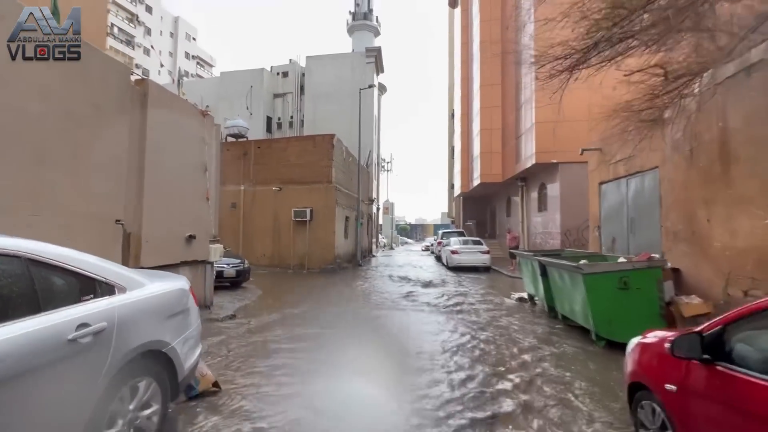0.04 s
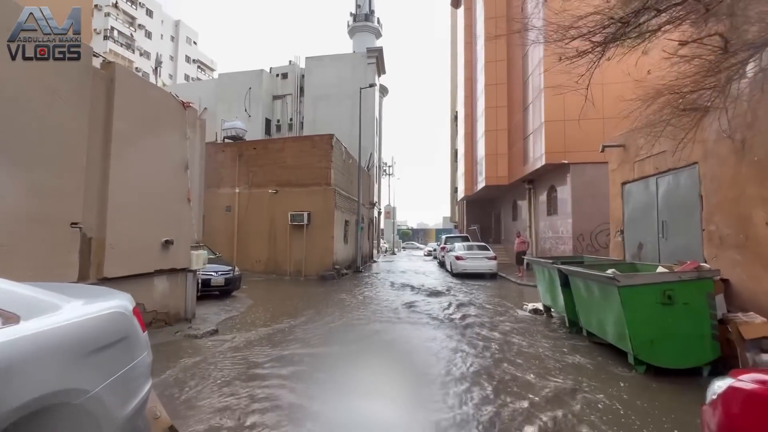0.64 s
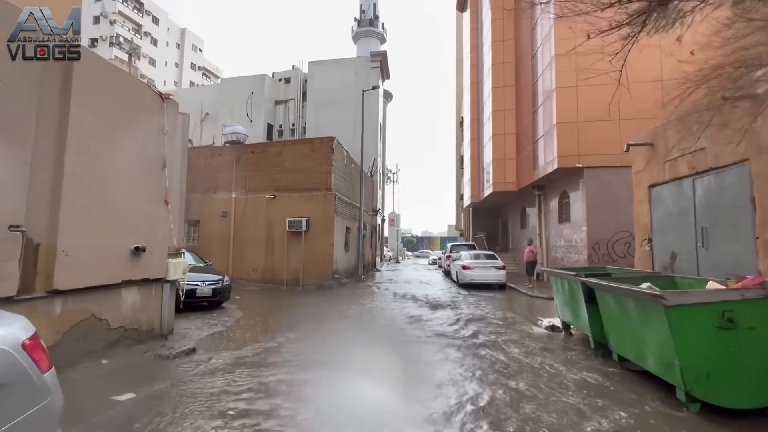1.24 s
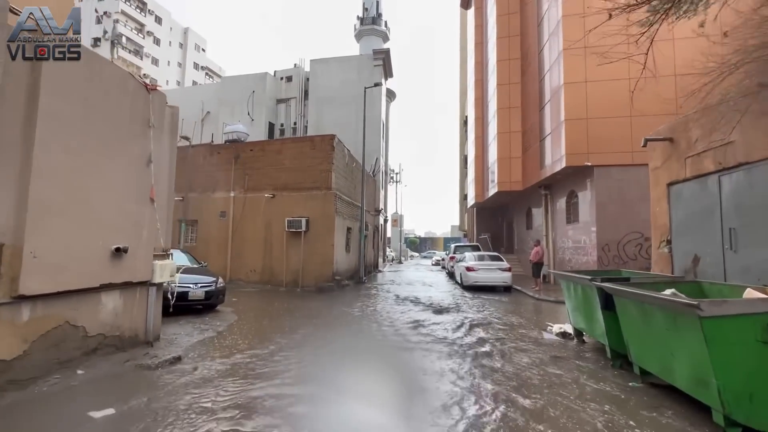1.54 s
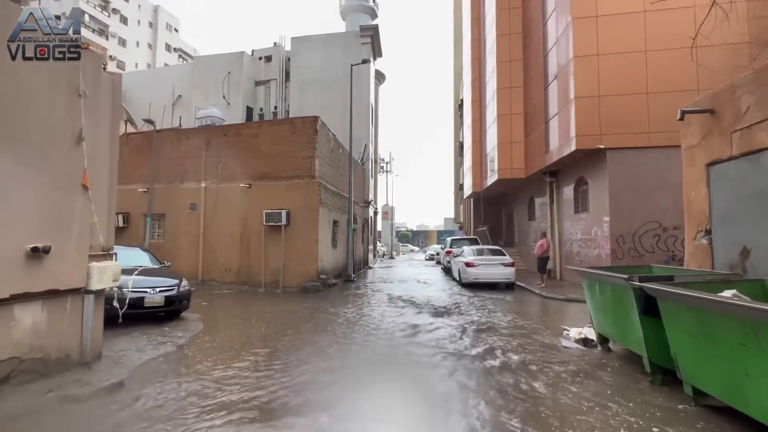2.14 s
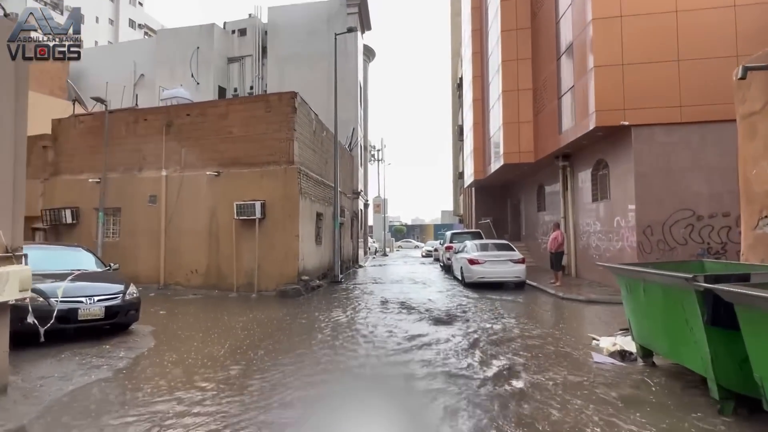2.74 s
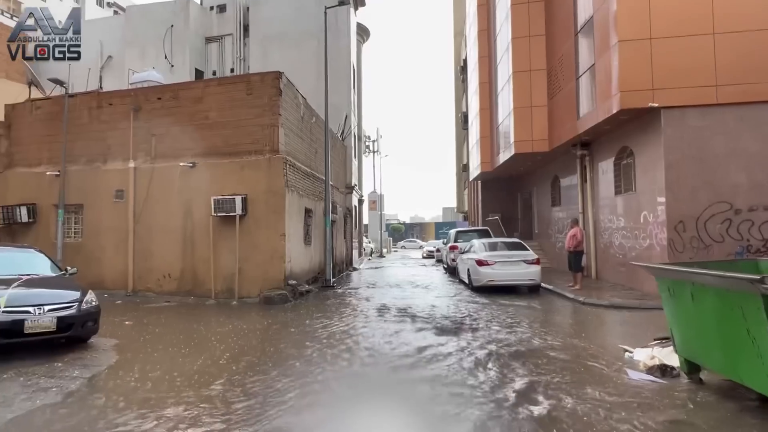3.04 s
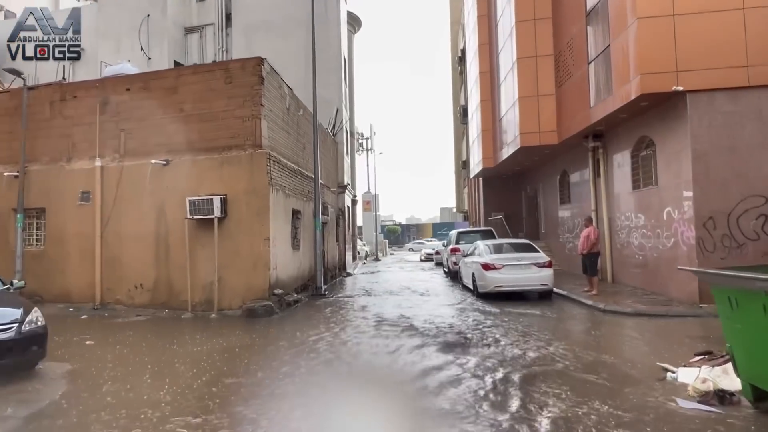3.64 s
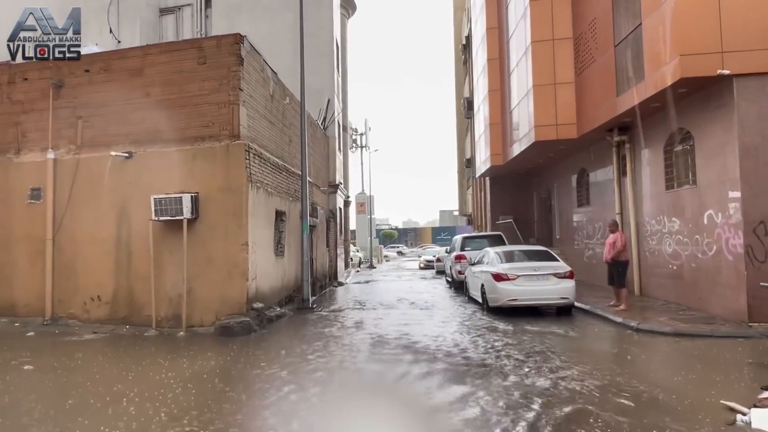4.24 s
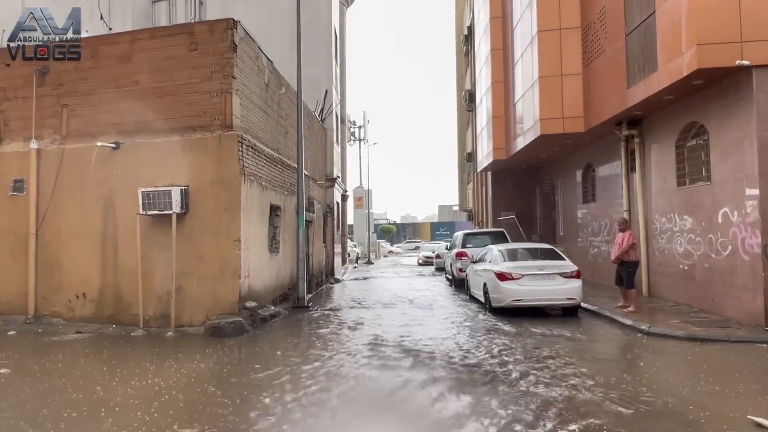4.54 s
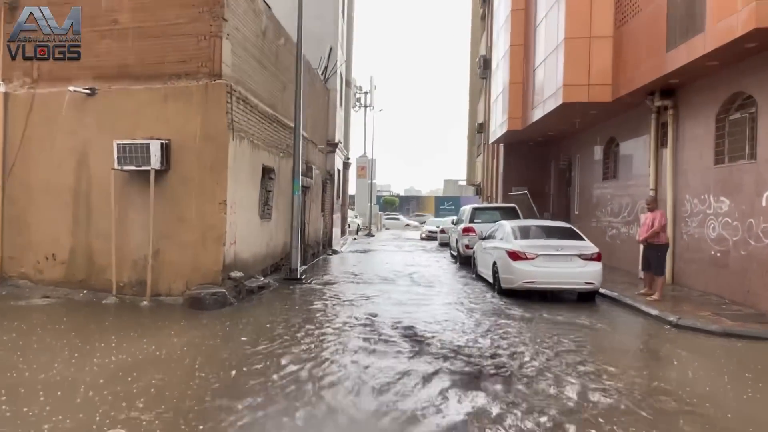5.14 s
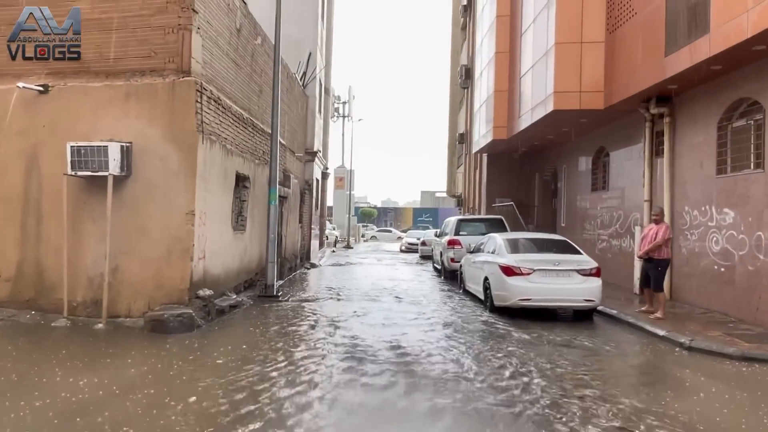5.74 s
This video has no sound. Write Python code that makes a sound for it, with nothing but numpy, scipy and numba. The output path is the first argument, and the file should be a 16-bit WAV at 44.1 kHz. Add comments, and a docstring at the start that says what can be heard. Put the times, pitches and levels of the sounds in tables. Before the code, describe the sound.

Rainwater runs steadily along a flooded street, babbling and gurgling, with small splashes and close plops.

```python
"""Rainwater runs along a flooded street between house walls, heard from a camera carried over it.
Ripples fold air into bubbles that babble near 1 kHz; larger pockets gurgle, plop and glug.
Crests break into churn, splash, sizzle and fine fizz with sharp ticks.
A few drops tap on the camera's casing, and air thumps softly on the microphone.
Under it all lie the wash of the whole street and a low rumble of town and moving air."""
import sys
import numpy as np
from scipy import signal
from scipy.fft import rfft, irfft
from scipy.io import wavfile
from scipy.ndimage import uniform_filter1d
from numba import njit

SR = 44100
rng = np.random.default_rng(int(sys.argv[2]) if len(sys.argv) > 2 else 0)


def generate_wav(sig):
    """Save sig (samples, or channels by samples) to the path in sys.argv[1] as 16-bit PCM at SR."""
    pcm = np.round(np.clip(np.atleast_2d(sig).T, -1, 1) * 32767).astype(np.int16)
    wavfile.write(sys.argv[1], SR, pcm)


N = 260571
TIME_S = np.arange(N) / SR
FREQ_HZ = np.maximum(np.fft.rfftfreq(N, 1 / SR), 1)

# Nearby current. Each row: time in seconds, level in dB against its usual strength.
CURRENT_STRENGTH = [(0, 0.5), (0.17, -2.5), (0.4, 0), (0.8, 3), (1.45, 1), (1.58, -0.5), (1.85, 2),
                    (2.15, -1), (2.35, -3.5), (2.6, 0.5), (3.15, 4), (3.29, 0), (3.5, 3.5), (3.85, 1),
                    (4.3, 3), (4.95, 1), (5.33, 0.5), (5.91, -1.5)]
# Steady gurgling. Each row: time in seconds, level in dB.
GURGLE_LEVELS = [(0, -42), (1.25, -49.5), (1.8, -47), (2.35, -59.5), (2.7, -43), (3.2, -46), (3.65, -45.5),
                 (3.85, -52), (4.2, -46.5), (4.5, -61.5), (5.35, -53), (5.91, -41.5)]
# Water folding over large air pockets. Each row: time in seconds, level in dB.
AIR_GULPS = [(0.2, -42), (0.76, -49), (1.035, -41.5), (1.385, -39.5), (2.61, -39), (2.99, -43),
             (3.11, -32.5), (5.555, -36), (5.84, -40)]
# Breaking crests. Each row: start and hold in seconds, relative babble, churn and splash levels in dB.
BREAKING_CRESTS = [(0.368, 0.019, -35.5, -46, -55), (0.49, 0.028, -38, -47, -66),
                   (0.687, 0.11, -39.5, -45, -50), (0.879, 0.035, -36.5, -44.5, -48),
                   (1.084, 0.055, -37, -46, -52), (1.207, 0.037, -35, -50, -52),
                   (1.31, 0.11, -41, -48, -50), (1.947, 0.08, -42, -48, -49), (2.208, 0.084, -61, -48, -46),
                   (2.404, 0.11, -38.5, -48.5, -48), (2.525, 0.11, -34.5, -48.5, -45.5),
                   (2.725, 0.18, -43, -66, -58), (2.957, 0.062, -37.5, -45, -52),
                   (3.048, 0.11, -42, -44, -42.5), (3.162, 0.075, -55, -49, -46),
                   (3.426, 0.057, -52, -40, -42), (3.518, 0.28, -51, -49.5, -45.5),
                   (3.593, 0.065, -42, -42, -45), (4.007, 0.041, -52, -48, -44.5),
                   (4.192, .015, -55, -53, -45.5), (4.25, 0.014, -46, -47, -48),
                   (4.691, .26, -59, -46.5, -41), (4.808, 0.2, -41.5, -59, -48.5),
                   (5.208, 0.02, -36, -46, -47.5), (5.55, 0.13, -55, -46, -49.5),
                   (5.844, 0.012, -30.5, -45, -43)]
# Air on the microphone. Each row: start and hold in seconds, relative level in dB.
AIR_PUFFS = [(0.023, 0.3, -52.5), (0.692, 0.28, -54.5), (1.328, 0.11, -53), (3.116, 0.087, -53),
             (3.705, 0.092, -53.5), (5.004, 0.12, -52.5), (5.545, 0.093, -44.5), (5.87, .04, -51)]
# Close bubbles. Each row: start in seconds, relative peak in dB, starting pitch in Hz, life in seconds,
# glide as a share of pitch, left minus right in dB.
CLOSE_BUBBLES = [(0.086, -23, 860, 0.023, -0.089, -6), (0.3639, -20, 905, 0.0074, .1, 7),
                 (0.376, -28, 1050, .008, -0.089, 0), (0.503, -27, 905, .014, 0.35, -3),
                 (0.5475, -18.5, 920, 0.0092, 0.37, 0), (0.547, -28, 1640, 0.014, 0.17, 21),
                 (0.689, -32, 770, 0.013, -0.0075, 2), (0.728, -27, 556, 0.12, -0.2, -5),
                 (0.757, -24, 552, 0.087, 0.15, -4), (0.772, -21.5, 532, 0.08, -0.039, 3),
                 (0.893, -24, 833, 0.046, 0.21, 0), (1.0865, -18.5, 1050, 0.027, .1, 1),
                 (1.165, -24, 1050, 0.022, .2, 1), (1.221, -28, 990, 0.028, .1, 0),
                 (1.2314, -15.5, 1030, 0.023, -0.072, -2), (1.291, -26, 940, 0.023, 0.0011, 4),
                 (1.3292, -19, 1450, 0.0079, 0.26, 2), (1.347, -22, 1090, 0.0073, 0.22, 0),
                 (1.964, -18, 910, 0.029, 0.057, -1), (2.139, -25.5, 1060, .015, 0.57, 8),
                 (2.191, -29, 1670, 0.024, -0.17, 16), (2.279, -21.5, 950, .007, .1, 10),
                 (2.426, -28.5, 1840, 0.024, 0.0063, 3), (2.477, -34.5, 3700, 0.016, .1, 0),
                 (2.522, -15.5, 1020, 0.03, 1.0, -1), (2.579, -22, 774, 0.02, -0.27, -7),
                 (2.581, -21, 1660, 0.0089, 0.12, 1), (2.622, -26, 937, 0.021, 0.052, -2),
                 (2.800, -20, 764, 0.024, -0.15, -3), (2.854, -20, 725, 0.023, 0.017, -4),
                 (2.877, -20.5, 1000, 0.011, -0.068, -2), (2.974, -27.5, 940, 0.032, -0.084, 6),
                 (2.987, -22, 830, 0.016, 0.013, -1), (3.009, -29, 1070, 0.023, 0.41, 0),
                 (3.052, -21, 894, 0.031, 0.14, 0), (3.056, -20.5, 643, 0.037, -0.23, -4),
                 (3.068, -27, 1520, 0.02, 0.73, 1), (3.091, -25, 880, 0.043, 0.061, -5),
                 (3.105, -20, 905, 0.03, 0.1, 2), (3.112, -20, 905, .025, 0.16, -4),
                 (3.138, -29, 977, 0.016, .2, 0), (3.357, -20, 925, 0.013, -0.21, -4),
                 (3.358, -29, 670, .025, 0.045, -7), (3.449, -22, 1510, 0.023, .1, 0),
                 (3.449, -25, 995, 0.038, 0.046, 0), (3.472, -23, 1060, 0.022, 0.042, -4),
                 (3.49, -23, 880, 0.018, .2, -5), (3.527, -23, 905, 0.037, 0.055, -1),
                 (3.555, -18, 930, 0.018, 0.38, -1), (3.625, -24, 1110, 0.02, -0.13, 2),
                 (3.6411, -18, 1045, 0.021, 0.33, 10), (3.642, -31, 1610, 0.026, 0.054, 15),
                 (3.709, -20.5, 970, .02, 0.0004, -3), (3.95, -27, 907, 0.041, 0.43, 3),
                 (4.0305, -20, 1040, 0.01, -0.023, 0), (4.0303, -25, 2470, 0.02, 0.16, -5),
                 (4.168, -21, 821, 0.023, .1, 0), (4.1974, -34, 2560, 0.031, .1, -2),
                 (4.695, -24, 940, .007, 0.2, -3), (4.783, -25.5, 1770, 0.018, 0.11, -1),
                 (4.839, -20.5, 740, 0.014, 0.071, -5), (4.904, -25, 835, 0.032, 0.23, -7),
                 (4.939, -22, 1000, 0.018, -0.41, -1), (4.959, -21, 980, .015, 0.13, 0),
                 (5.064, -24.5, 990, 0.04, 0.16, 1), (5.197, -29, 1070, 0.01, 0.18, -9),
                 (5.593, -27, 573, .014, -0.033, -15), (5.669, -26.5, 1700, 0.013, -0.11, 16),
                 (5.8473, -30, 1940, 0.009, -0.01, -4)]
# Closing hollows. Each row: start in seconds, relative peak in dB, first and last pitch in Hz,
# length in seconds, left minus right in dB.
CLOSING_HOLLOWS = [(0.194, -31, 493, 510, 0.032, 0), (0.228, -26, 645, 1180, 0.021, 2),
                   (0.796, -27.5, 855, 1207, 0.024, -2), (1.113, -26, 814, 1160, 0.023, -6),
                   (1.135, -28, 820, 1120, 0.024, -2), (1.379, -29, 940, 1220, 0.017, 0),
                   (1.381, -24.5, 527, 670, 0.023, 4), (1.395, -26.5, 645, 1080, .02, 3),
                   (2.588, -26.5, 772, 1060, .022, -1), (3.102, -23, 630, 970, 0.023, -4),
                   (3.734, -30, 880, 1140, 0.023, -5), (5.548, -30, 760, 1350, .018, -4),
                   (5.59, -28, 900, 1450, .023, -6)]
# Close spray. Each row: start in seconds, relative ring peak in dB, starting pitch in Hz,
# relative snap level in dB.
SPRAY_TICKS = [(0.6522, -31, 8900, -40), (0.912, -36, 10500, -45), (1.0427, -27, 9700, -45),
               (1.246, -32, 10200, -42), (1.257, -31, 8900, -50), (1.4297, -35, 8900, -50),
               (1.4453, -16.5, 10600, -43), (1.5254, -27, 8650, -40), (1.6611, -26, 9800, -48),
               (2.2034, -31.5, 9100, -45), (2.4563, -28, 8860, -46), (2.5341, -34, 8650, -52),
               (2.584, -36, 8600, -51), (3.067, -31, 8350, -35), (3.6068, -27, 8900, -48),
               (3.6767, -24, 9000, -32), (3.696, -30, 8400, -44), (3.8287, -30, 9400, -46),
               (4.1985, -32.5, 8000, -48), (5.49, -34, 9600, -45)]
# Taps of drops on the casing and soft low thumps of air on the microphone. Each row: start in seconds,
# tap peak in dB, tap life in seconds, thud peak in dB, starting thud pitch in Hz, left minus right in dB.
CAMERA_KNOCKS = [(0.881, -42, .02, -38, 75, -6), (1.382, -31, 0.1, -40, 202, 14),
                 (1.815, -45, .02, -40, 151, 2), (2.984, -24, 0.013, -39, 215, 6),
                 (3.354, -30, .02, -37.5, 116, -13), (4.26, -16.5, 0.0041, -31, 188, 8),
                 (4.329, -40, .004, -40, 116, -2), (5.022, -40, .02, -37, 68, 5),
                 (5.19, -44, .02, -36.5, 180, 2), (5.233, -46, .01, -41.5, 95, 2),
                 (5.546, -25, 0.33, -52, 100, -8), (5.593, -29, 0.21, -44, 100, -7),
                 (5.667, -23.5, 0.055, -53, 142, 11), (5.84, -27, 0.1, -49, 109, -8)]

# Source spectra. Each row: frequency in Hz, gain in dB.
GURGLE_EQ = [(130, -25), (220, -6), (300, -3.5), (390, -2.5), (500, 0), (620, -1), (800, -10), (1200, -40)]
BABBLE_EQ = [(300, -16), (520, -4.5), (700, 4), (950, 2), (1120, 0.5), (1350, -9.5), (1650, -13),
             (2200, -40), (4000, -20)]
CHURN_EQ = [(700, -12), (1150, -14), (1500, -1), (1850, -3.5), (2300, -10), (3200, -13.5), (5000, -27)]
SPLASH_EQ = [(500, -18), (1000, 10), (1600, -7), (2050, -5), (2600, -2), (3300, -9), (4000, -12.5),
             (5000, -25.5), (6400, -25.5), (7300, -63)]
NOTES_EQ = [(480, -4), (650, 1), (950, -1), (1200, -3.5), (1600, -8), (2100, -26), (2600, -23), (3400, -23)]
SIZZLE_EQ = [(2600, -8), (3500, 3.5), (4400, 3), (5200, -6.5), (6000, -3.5), (6600, -15), (7100, -30),
             (7600, -50)]
FIZZ_EQ = [(7000, -89), (7850, -31), (8020, 8), (9300, 6), (10000, 3.5), (11000, -5), (12000, -13),
           (13000, -25.5), (13600, -55)]
WASH_EQ = [(40, -22), (150, -10.5), (280, -9), (420, -11), (620, -4), (950, 2.5), (1400, -6), (2500, -13.5),
           (4000, -24), (7000, -58.5)]
RUMBLE_EQ = [(20, -61), (35, -7.5), (55, 0), (82, 3), (115, -2), (170, -4), (300, -15.5), (500, -7.5),
             (1200, -71)]
TICK_EQ = [(2000, -10), (5000, -11), (6400, -8), (7600, -28), (8100, 14), (11000, -5), (13000, -12)]
SNAP_EQ = [(1500, -4), (2600, -2), (4000, 2), (5500, -19), (6600, -12), (7400, -32), (8100, 3), (10500, 9),
           (13000, -22)]
# Broader babble and hollower fizz once the camera has turned. Each row: frequency in Hz, gain in dB.
TURNED_BABBLE_EQ = [(450, 1), (620, 5.5), (900, -7.5), (1200, -0.5), (1600, 3)]
TURNED_FIZZ_EQ = [(7500, 12), (8300, 2), (8650, 1), (8900, -7.5), (9400, 2), (9900, -2.5), (10400, -2.5),
                  (11200, 0.5), (13000, -2)]
# Phase between the microphone ports. Each row: frequency in Hz, lag of the left in radians.
MIC_LAG = [(20, 1.1), (150, 1.6), (300, 3.0), (480, 4.1), (760, 4.4), (900, 6.4), (1500, 6.4), (2000, 6.8),
           (3000, 5.5), (4000, 6.2)]
# Balance of the ports. Each row: frequency in Hz, left minus right in dB.
MIC_BALANCE = [(30, -1), (90, -2.5), (200, -4), (550, -4), (850, 2), (1600, 1), (2200, -1.5), (3500, -2),
               (5000, 0)]

TURN_START_S, TURN_LENGTH_S = 3.66, 0.99
TURN_SHARE = np.clip((TIME_S - TURN_START_S) / TURN_LENGTH_S, 0, 1)
BASS_DELAY_S, BASS_CORNER_HZ, LOWPASS_HZ = 0.0076, 430, 13500


def undb(db):
    """Decibels to gain."""
    return 10 ** (np.asarray(db) / 20)


def unit(x):
    """Scale to rms 1."""
    return x / np.sqrt(np.mean(x ** 2))


def over_hz(points):
    """Interpolate (Hz, value) points over log frequency."""
    hz, value = np.transpose(points)
    return np.interp(np.log(FREQ_HZ), np.log(hz), value)


def tint(x, eq):
    """Filter with a (Hz, dB) curve."""
    return irfft(rfft(x) * undb(over_hz(eq)), N)


def turning(x, eq):
    """Fade a filter in as the camera turns."""
    return (1 - TURN_SHARE) * x + TURN_SHARE * tint(x, eq)


def sides(pan_db):
    """Left and right gains for a level difference."""
    return undb(np.array([pan_db, -pan_db]) / 2)


def wander(rate_hz):
    """Random steps, smoothed twice; rms 1."""
    step = int(SR / rate_hz)
    held = np.repeat(rng.standard_normal(N // step + 1), step)
    return unit(uniform_filter1d(uniform_filter1d(held, step), step)[:N])


def noise(correlation):
    """Stereo white noise, rms 1."""
    mid, side = rng.standard_normal((2, N))
    return unit(np.sqrt(1 + correlation) * mid + np.sqrt(1 - correlation) * np.array([side, -side]))


def swell(start_s, hold_s, level_db, attack_s, release_s):
    """Summed power of events that rise until their start, hold and decay."""
    power = np.zeros(N)
    for at_s, length_s, gain in np.broadcast(start_s, hold_s, undb(level_db)):
        rise = np.clip(1 + (TIME_S - at_s) / attack_s, 0, 1)
        fall = np.exp(-np.clip((TIME_S - at_s - length_s) / release_s, 0, 20))
        power += (gain * rise * fall) ** 2
    return power


def on_top(steady_db, power):
    """Steady level plus swells, in dB."""
    return 10 * np.log10(undb(steady_db) ** 2 + power)


@njit
def ring(start_s, hz, life_s, glide, gains, attack):
    """Gliding sines that swell over the attack share of their life, then decay at 60 dB per life."""
    out = np.zeros((2, N))
    for k in range(len(start_s)):
        first, count = int(start_s[k] * SR), int(life_s[k] * SR)
        phase = 0.
        for i in range(min(count, N - first)):
            age = i / count
            phase += hz[k] * (1 + glide[k] * age) / SR
            if age < attack:
                envelope = np.sin(np.pi / 2 * age / attack) ** 2
            else:
                envelope = np.exp(-6.9 * (age - attack))
            sample = envelope * np.sin(2 * np.pi * phase)
            out[0, first + i] += gains[0, k] * sample
            out[1, first + i] += gains[1, k] * sample
    return out


def swarm(count, low_hz, high_hz, cycles, glide, spread_db, pan_db, attack):
    """Random bubbles, most faint, a few strong; rms 1."""
    when, pitch, size, length, place = rng.random((count, 5)).T
    hz = low_hz * (high_hz / low_hz) ** pitch
    life_s = cycles * (.5 + length) / hz
    size_db = -spread_db * np.log(size + .02)
    gains = undb(size_db) * hz * sides(pan_db * (2 * place - 1))  # the factor hz levels the spectrum
    return unit(ring(when * N / SR, hz, life_s, glide * 2 * length, gains, attack))


def gurgle():
    """Large air pockets ring low and now and then crowd into a gulp."""
    bubbles = swarm(2600, low_hz=160, high_hz=900, cycles=9, glide=.3,
                    spread_db=2.5, pan_db=10, attack=.12)
    start_s, gulp_db = np.transpose(AIR_GULPS)
    gulps = swell(start_s, hold_s=.03, level_db=gulp_db, attack_s=.037, release_s=.031)
    steady_db = np.interp(TIME_S, *np.transpose(GURGLE_LEVELS))
    return unit(tint(bubbles, GURGLE_EQ)) * undb(on_top(steady_db, gulps))


def babble(level_db):
    """Ripples fold in air: short rising bubbles with a slight, quick flicker in level."""
    bubbles = swarm(6000, low_hz=450, high_hz=2600, cycles=16, glide=.45,
                    spread_db=2.3, pan_db=9, attack=.15)
    bubbles = turning(tint(bubbles, BABBLE_EQ), TURNED_BABBLE_EQ)
    flicker_db = .5 * wander(rate_hz=45)
    return unit(bubbles * undb(flicker_db)) * undb(level_db)


def churn(level_db):
    """Toppling crests stir in mid-sized bubbles that ring and glide up."""
    bubbles = swarm(5000, low_hz=1050, high_hz=3300, cycles=22, glide=.2,
                    spread_db=2.7, pan_db=9, attack=.07)
    return unit(tint(bubbles, CHURN_EQ)) * undb(level_db)


def splash(drive_db, burst_db):
    """Breaking crests: tiny bubbles and a few clearer ones in a soft hiss."""
    froth = swarm(15000, low_hz=900, high_hz=7500, cycles=25, glide=.12,
                  spread_db=3.5, pan_db=12, attack=.05)
    tinkle = swarm(1600, low_hz=1300, high_hz=3600, cycles=36, glide=.12,
                   spread_db=2.6, pan_db=10, attack=.03)
    water = froth + undb(-4) * tinkle + noise(correlation=.3)
    return unit(tint(water, SPLASH_EQ) * undb(burst_db)) * undb(drive_db + .5)


def notes(level_db):
    """A few surface bubbles ring longer and stand out as rising notes."""
    bubbles = swarm(800, low_hz=520, high_hz=2600, cycles=30, glide=.7,
                    spread_db=1.6, pan_db=8, attack=.12)
    return unit(tint(bubbles, NOTES_EQ)) * undb(level_db)


def sizzle(level_db, burst_db):
    """Droplets thrown by crests fall back and prickle on the surface."""
    drops = swarm(12000, low_hz=2800, high_hz=7200, cycles=28, glide=.08,
                  spread_db=3, pan_db=10, attack=.03)
    return unit(tint(drops, SIZZLE_EQ) * undb(burst_db)) * undb(level_db)


def fizz(level_db, burst_db, turn_fade_db=-5.5):
    """The finest spray; hollower and fainter as the camera turns."""
    mist = swarm(9000, low_hz=7500, high_hz=13500, cycles=30, glide=.05,
                 spread_db=3.5, pan_db=4, attack=.03)
    mist = tint(mist + undb(4) * noise(correlation=.8), FIZZ_EQ)
    mist = turning(mist, TURNED_FIZZ_EQ)
    return unit(mist * undb(burst_db)) * undb(level_db + turn_fade_db * TURN_SHARE)


def wash(level_db):
    """The rest of the street's water, blurred by distance."""
    return unit(tint(noise(correlation=.025), WASH_EQ)) * undb(level_db + .5 * wander(rate_hz=5.2))


def rumble():
    """Low noise of the town and of moving air that puffs on the microphone."""
    puffs = swell(*np.transpose(AIR_PUFFS), attack_s=.035, release_s=.059)
    level_db = on_top(-56 - wander(rate_hz=10), puffs) + 5
    return unit(tint(noise(correlation=.68), RUMBLE_EQ)) * undb(level_db)


def plops():
    """Close bubbles ring, each opening with a higher snap as its neck closes."""
    start_s, peak_db, hz, life_s, glide, pan_db = np.transpose(CLOSE_BUBBLES).copy()
    gains = undb(peak_db - 2) * sides(pan_db)
    snaps = ring(start_s, 1.7 * hz, 6 / hz, glide / 4, undb(-13) * gains, attack=.15)
    return ring(start_s, hz, life_s, glide, gains, attack=.051) + snaps


def glugs():
    """A hollow in the water closes: its note swells, climbs ever faster and stops."""
    out = np.zeros((2, N))
    for start_s, peak_db, from_hz, to_hz, length_s, pan_db in CLOSING_HOLLOWS:
        age = np.linspace(0, 1, int(length_s * SR))
        hz = from_hz + (to_hz - from_hz) * age ** 1.33
        envelope = np.sin(np.pi / 2 * np.interp(age, [0, .17, 1], [0, 1, 0]))
        note = undb(peak_db) * envelope * np.sin(2 * np.pi * np.cumsum(hz) / SR)
        first = int(start_s * SR)
        out[:, first:first + len(note)] += np.outer(sides(pan_db), note)
    return out


def ticks(snap_t60_s=.01):
    """Close droplets hit with a broad snap and ring for a few milliseconds."""
    start_s, ring_db, hz, snap_db = np.transpose(SPRAY_TICKS).copy()
    gains = np.tile(undb(ring_db - 3.5), (2, 1))
    rings = ring(start_s + .001, hz, life_s=60 / hz, glide=np.full(len(hz), .3), gains=gains, attack=.02)
    snap_power = swell(start_s + .0015, hold_s=0, level_db=snap_db,
                       attack_s=.0003, release_s=snap_t60_s / np.log(1000))
    snaps = unit(tint(rng.standard_normal(N), SNAP_EQ)) * np.sqrt(snap_power)
    return tint(rings, TICK_EQ) + snaps


def knocks():
    """Drops tap the casing or air thumps the microphone: a dull tap and a low thud sagging in pitch."""
    start_s, tap_db, tap_life_s, thud_db, thud_hz, pan_db = np.transpose(CAMERA_KNOCKS).copy()
    sag = np.full(len(start_s), -.4)
    out = ring(start_s, thud_hz, 7 / thud_hz, sag, undb(thud_db) * sides(pan_db), attack=.12)
    dull_band = signal.butter(4, [90, 1700], "bandpass", fs=SR, output="sos")
    age_s = TIME_S[:SR // 4]
    for k, first in enumerate((start_s * SR).astype(int)):
        force = rng.standard_normal(len(age_s)) * np.exp(-np.log(1000) * age_s / tap_life_s[k])
        force[0] += 24  # impact
        tap = signal.sosfilt(dull_band, force)[:N - first]
        tap *= undb(tap_db[k]) / np.abs(tap).max()
        out[:, first:first + len(tap)] += np.outer(sides(pan_db[k]), tap)
    return out


def walls(x, t60_s, wet_db, gap_s=.006):
    """House fronts add a faint diffuse echo."""
    age_s = TIME_S[:SR // 2]
    tail = rng.standard_normal((2, len(age_s))) * np.exp(-np.log(1000) * age_s / t60_s) * (age_s > gap_s)
    tail /= np.sqrt(np.sum(tail ** 2, axis=1, keepdims=True))
    return x + undb(wet_db) * signal.fftconvolve(x, tail, axes=1)[:, :N]


def ports(x):
    """Airborne sound meets the two microphone ports at different level and phase."""
    phase_rad = np.outer([-1, 0], over_hz(MIC_LAG))
    response = sides(over_hz(MIC_BALANCE)) * np.exp(1j * phase_rad)
    return irfft(rfft(x) * response, N)


def scene():
    """Current and crests drive the water's levels; knocks reach both sides at once."""
    flow_db = np.interp(TIME_S, *np.transpose(CURRENT_STRENGTH))
    start_s, hold_s, fold_db, stir_db, spray_db = np.transpose(BREAKING_CRESTS)
    fold = swell(start_s, hold_s, fold_db, attack_s=.013, release_s=.0056)
    stir = swell(start_s, hold_s, stir_db, attack_s=.0092, release_s=.016)
    spray = swell(start_s, hold_s, spray_db, attack_s=.0092, release_s=.016)
    burst_db = wander(rate_hz=60)  # splash, sizzle and fizz are thrown together

    water = gurgle()
    water += babble(on_top(-41 + .44 * flow_db, fold))
    water += churn(on_top(-53.5 + flow_db, stir))
    water += splash(on_top(-49 + flow_db, spray), 2 * burst_db)
    water += notes(-46 + .44 * flow_db)
    water += sizzle(on_top(-69 + .9 * flow_db, spray * undb(-15) ** 2), burst_db)
    water = walls(water, t60_s=.2, wet_db=-13)

    fizz_db = on_top(-48.5 + .45 * flow_db, spray * undb(-2) ** 2)
    fine_spray = (fizz(fizz_db, burst_db) + ticks()) * undb([[-17], [5.5]])  # mainly at the right port
    background = wash(-41 + .1 * flow_db) + rumble()
    return ports(water + fine_spray + background + plops() + glugs()) + knocks()


def record(dry):
    """Delay the bass slightly and cut the top."""
    lag_rad = 2 * np.pi * BASS_DELAY_S * BASS_CORNER_HZ * np.tanh(FREQ_HZ / BASS_CORNER_HZ)
    delayed = irfft(rfft(dry) * np.exp(-1j * lag_rad), N)
    lowpass = signal.ellip(8, .2, 70, LOWPASS_HZ, fs=SR, output="sos")
    return signal.sosfilt(lowpass, delayed)


dry = scene()
out = record(dry)
generate_wav(out)
```